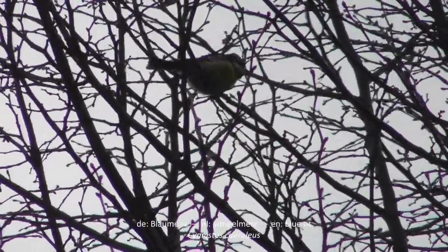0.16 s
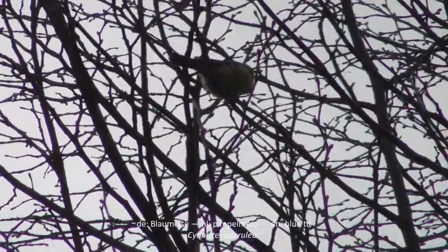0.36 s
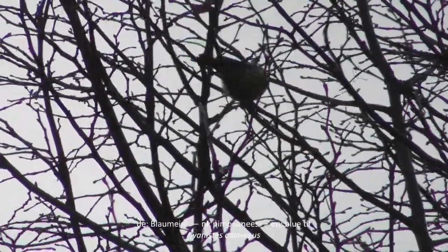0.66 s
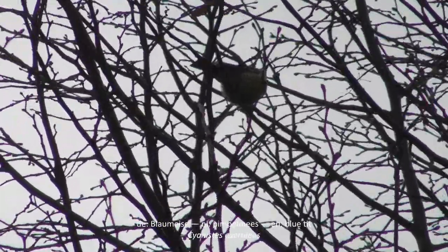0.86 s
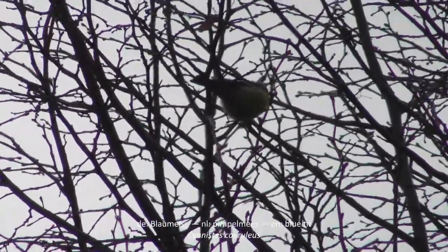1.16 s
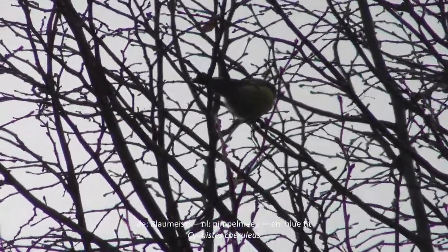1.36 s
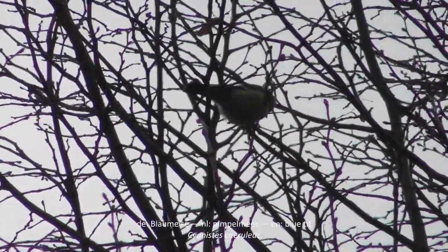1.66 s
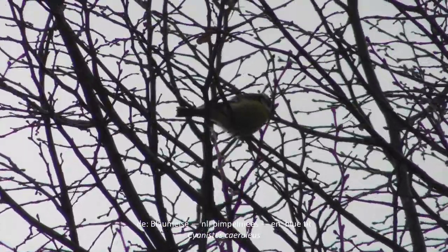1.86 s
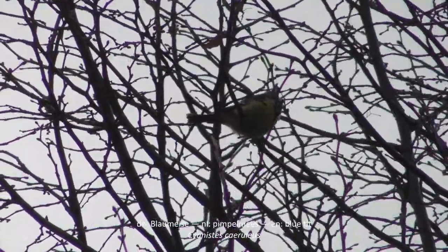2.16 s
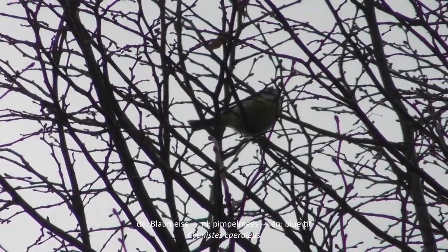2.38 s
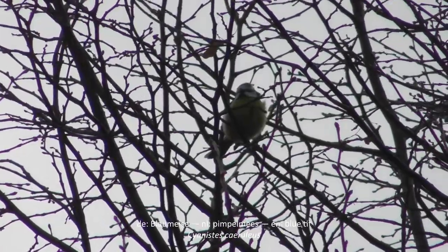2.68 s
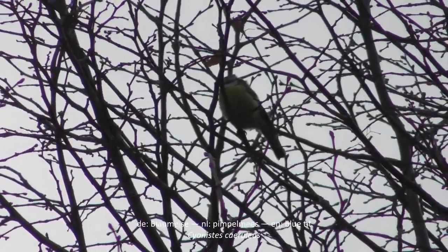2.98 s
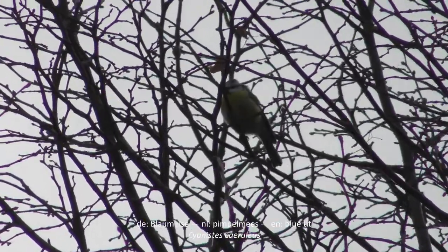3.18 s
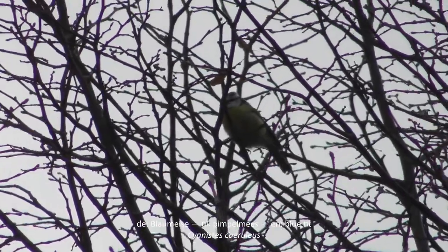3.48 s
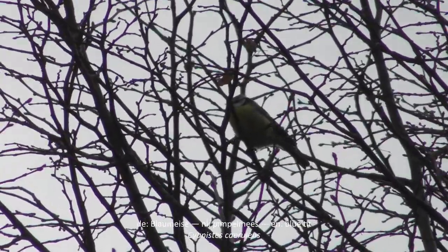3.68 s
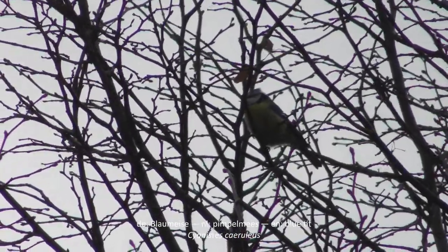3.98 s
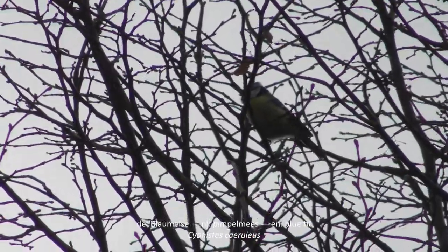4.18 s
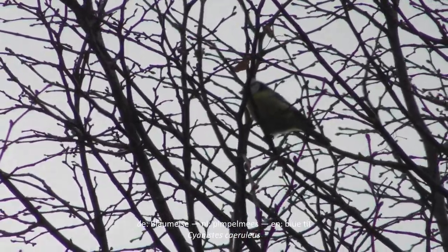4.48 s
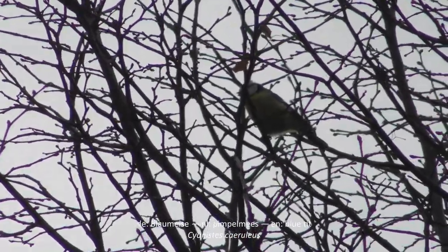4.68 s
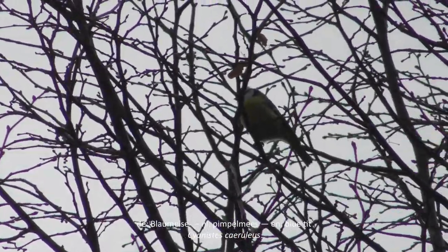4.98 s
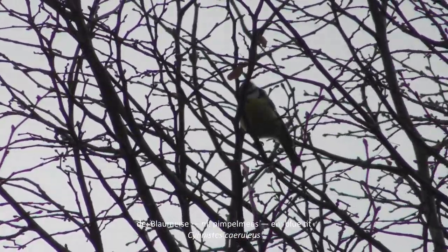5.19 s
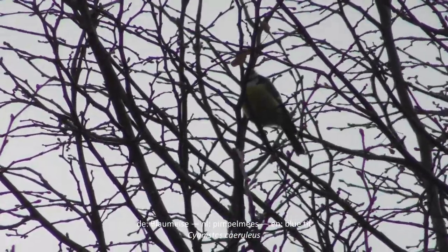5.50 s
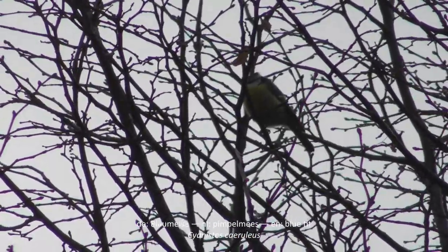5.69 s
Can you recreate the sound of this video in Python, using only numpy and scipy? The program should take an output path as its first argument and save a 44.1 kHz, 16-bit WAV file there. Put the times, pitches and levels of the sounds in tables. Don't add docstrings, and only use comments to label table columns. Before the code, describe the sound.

A small songbird in bare branches, heard outdoors through a camera microphone. From 0 to 0.65 s it gives five short, even, high notes near 4.8 kHz, about eight per second, with a light reverberant tail. Then it rests. Distant traffic fills the gap: a deep rumble, low drone and wavering engine hum, strongest around 1 s and easing by 3 s, under faint steady hiss. The camera's focus motor whirs softly and grainily, high-pitched, at 0.3, 1.5-1.9, 2.5-2.9, 4.0 and 5.8 s. At 3.45 and 3.72 s come two thin whistles, each flicking buzzily upward then falling from about 7.5 to 5.7 kHz, the second more broken. Seven slightly louder trill notes follow from 3.96 to 4.83 s, starting a little higher. Faint twig ticks occur at 0.4, 4.3, 4.4 and 5.05 s; dry leaves rustle most near 5 s. Very faint distant bird pipes appear at 0.14, 2.4 and 5.7 s.

```python
import sys
import numpy as np
from scipy import signal
from scipy.fft import rfft, irfft, next_fast_len
from scipy.io import wavfile
from scipy.ndimage import uniform_filter1d

SR = 44100
rng = np.random.default_rng(int(sys.argv[2]) if len(sys.argv) > 2 else 0)


def boost(x):
    u = np.asarray(x, float) / 20
    return 10 ** u


def put_to_file(sound):
    columns = np.atleast_2d(sound).T
    safe = np.clip(columns, -1, 1)
    whole_steps = np.round(safe * 32767)
    wavfile.write(sys.argv[1], SR, whole_steps.astype(np.int16))


N = 257544


def rms_one(x):
    return x / np.sqrt(np.mean(x ** 2) + 1e-20)


def in_time(rows):
    s, level_db = np.transpose(rows)
    return np.interp(np.arange(N) / SR, s, level_db)


def at_hz(points, hz):
    points_hz, values = np.transpose(points)
    return np.interp(np.log(hz), np.log(points_hz), values)


def drift(rate_hz):
    r = np.exp(-80 * np.pi * rate_hz / SR)
    white = rng.standard_normal(N // 40 + 2002)
    slow = signal.lfilter([1], [1, -2 * r, r * r], white)[2000:]
    return np.interp(np.arange(N) / 40, np.arange(len(slow)), rms_one(slow))


def resonance(x, hz, width_hz):
    r = np.exp(-np.pi * width_hz / SR)
    poles = [1, -2 * r * np.cos(2 * np.pi * hz / SR), r * r]
    return signal.lfilter([(1 - r * r) / 2, 0, (r * r - 1) / 2], poles, x)


def stereo(mid, side, hz):
    # (frequency [Hz], likeness [0..1])
    likeness = [(25, 0.01), (60, 0.55), (130, 0.68), (290, 0.78), (640, 0.7), (1410, 0.75), (5000, .8),
                (15000, 0.2)]
    # (frequency [Hz], level [dB])
    lean_db = [(30, -3), (70, -4.5), (130, -4.5), (250, -2.5), (500, -.8), (1000, 0.0), (8120, -.5),
               (15000, 0.5)]
    alike = at_hz(likeness, hz)
    lean = boost(at_hz(lean_db, hz) / 2 * np.array([[1], [-1]]))
    spread = np.sqrt(1 + alike) * mid + np.sqrt(1 - alike) * side * [[1], [-1]]
    return lean * spread / np.sqrt(1 + alike)


def stereo_noise(spectrum, step_oct, patchy_db):
    size = next_fast_len(N, real=True)
    hz = np.maximum(np.fft.rfftfreq(size, 1 / SR), 1)
    lowest_hz, highest_hz = spectrum[0][0], spectrum[-1][0]
    coloured = rfft(rng.standard_normal((2, size))) * boost(at_hz(spectrum, hz)) * (hz > lowest_hz)
    out = 0
    for centre_oct in np.arange(np.log2(lowest_hz), np.log2(highest_hz) + step_oct, step_oct):
        band = np.clip(1 - np.abs(np.log2(hz) - centre_oct) / step_oct, 0, 1)
        mid, side = irfft(coloured * band, size)[:, :N]
        out = out + boost(patchy_db * drift(2.8)) * stereo(mid, side, 2 ** centre_oct)
    return out / np.std(out.mean(axis=0))


def traffic():
    # (time [s], level [dB])
    nearness = [(0.0, -45.5), (0.93, -46.5), (0.96, -46), (1.06, -44.5), (2.18, -50), (3.37, -53),
                (3.67, -52.5), (3.71, -51), (4.57, -53.5), (4.98, -51.5), (5.73, -51.5), (5.84, -51)]
    # (frequency [Hz], density [dB per Hz])
    deep_spectrum = [(12, -29), (20, -21.5), (48, 9), (64, -5.5), (85, -6.5), (110, -58), (190, -120)]
    drone_spectrum = [(50, -35), (85, -1.5), (103, -3.5), (167, -4), (236, -1.5), (290, -6), (380, -32),
                      (640, -120)]
    roar_spectrum = [(170, -34.5), (290, -5), (312, -3.5), (434, 0), (554, -8.5), (633, -8), (930, -14),
                     (1090, -17.5), (1280, -28.5), (1450, -41), (1880, -62), (3190, -120)]
    # (start [s], end [s], pitch [Hz], waver [Hz], level [dB])
    engine_lines = [
        (-.3, 3.3, 59, 5, -55.5),
        (3.3, 4.6, 58, 6, -60),
        (4.5, 5.4, 50, 3, -56),
        (.85, 2.65, 103, 3, -58),
        (3.3, 3.95, 104, 4, -57),
        (-.3, .65, 235, 4, -56),
        (.2, .7, 435, 10, -61),
        (1.7, 2.9, 372, 10, -65),
        (3.85, 4.3, 392, 8, -64),
        (3.4, 3.9, 204, 6, -63),
    ]
    near_db = in_time(nearness)
    mean_db = near_db.mean()
    swing_db = near_db - mean_db
    t, hums = np.arange(N) / SR, 0
    for start_s, end_s, hz, waver_hz, hum_db in engine_lines:
        gate = np.clip(np.minimum(t - start_s, end_s - t) / .15, 0, 1)
        swell = gate * boost(hum_db + 3.5 * drift(4.0))
        phase = 2 * np.pi * np.cumsum(hz + .5 * waver_hz * drift(3.06)) / SR
        hums = hums + np.sqrt(2) * swell * stereo(np.sin(phase), np.cos(phase), hz)
    deep = boost(mean_db - 10.5 + 0.41 * swing_db) * stereo_noise(deep_spectrum, 0.89, patchy_db=1.8)
    drone = boost(mean_db - 5 + 0.87 * swing_db) * stereo_noise(drone_spectrum, 1, patchy_db=1.2)
    roar = boost(mean_db - 5.5 + 0.57 * swing_db) * stereo_noise(roar_spectrum, .5, patchy_db=.6)
    return deep + drone + hums + roar


def air():
    # (frequency [Hz], density [dB per Hz])
    hiss_spectrum = [(880, -24), (1450, -7.5), (1900, -8), (2480, -9.5), (4210, -10.5), (5070, -12),
                     (5710, -7), (7660, 1.5), (12200, -1), (15700, -2)]
    # (time [s], level [dB])
    breeze = [
        (0, -27),
        (1.5, 0),
        (3.3, -3),
        (4.2, 3.5),
        (5.05, 8),
        (5.4, 5),
        (5.84, 7),
    ]
    hiss = boost(-68.5) * stereo_noise(hiss_spectrum, 0.22, patchy_db=0.1)
    leaves = resonance(resonance(rng.standard_normal(N), 6830, 3300.0), 6830, 3300.0)
    return hiss + boost(-74.5 + in_time(breeze) + 0.58 * drift(12.0)) * rms_one(leaves)


def housing(x):
    # (frequency [Hz], width [Hz], share lost [0..1])
    dips = [(1470, 150, .75), (2480, 250, .5), (5100, 400, .5)]
    for hz, width_hz, share in dips:
        x = x - share * resonance(x, hz, width_hz)
    return x


def sing(notes, wobble_hz, tilt_db, sag_hz, ragged):
    # (frequency [Hz], gain [dB])
    throat = [(1500, -45), (3000, -35), (4800, -3), (6500, -0.5), (8200, 8.5), (10000, -5), (12000, -22),
              (16000, -25)]
    sag_s = 0.0252
    out = np.zeros(N)
    wobble, flutter, level_flutter = wobble_hz * drift(75.0), drift(225.0), drift(96.0)
    k = np.arange(1, 11)[:, None]
    for note in notes:
        s, hz, level_db, overtone_db = np.transpose(note)
        at = np.arange(round(s[0] * SR), min(round(s[-1] * SR), N))
        t = at / SR
        richness_db = np.interp(t, s, overtone_db)
        pitch = uniform_filter1d(np.exp(np.interp(t, s, np.log(hz))), size=88) + wobble[at]
        pitch -= sag_hz * np.clip(1 - (s[-1] - t) / sag_s, 0, 1) ** 2
        pitch *= 1 + 0.064 * boost(richness_db) * flutter[at]
        phase = 2 * np.pi * np.cumsum(pitch) / SR
        partial_db = (k > 1) * (richness_db + tilt_db * (k - 2)) + at_hz(throat, k * pitch)
        stack = boost(partial_db) * (k * pitch < SR / 2) * np.sin(k * phase + k * k)
        fade = np.clip(np.minimum(at - at[0], at[-1] - at) / (.006 * SR), 0, 1)
        level = boost(uniform_filter1d(np.interp(t, s, level_db), size=132)) * (1 + ragged * level_flutter[at])
        out[at] += np.sqrt(2) * np.sin(np.pi / 2 * fade) ** 2 * level * stack.sum(axis=0)
    return out


def far_birds():
    # (start [s], length [s], first pitch [Hz], last pitch [Hz], level [dB])
    pipes = [
        (0, .05, 4900, 4930, -59),
        (.14, .16, 8050, 7950, -87),
        (2.40, .11, 5100, 5180, -82),
        (5.68, .1, 7950, 7940, -86),
    ]
    return [[(start_s, first_hz, level_db, -40), (start_s + length_s, last_hz, level_db, -40)]
            for start_s, length_s, first_hz, last_hz, level_db in pipes]


def trill():
    # (start [s], first pitch [Hz], last pitch [Hz], level [dB], swell through the note [dB])
    trill_rows = [(0.033, 4984, 4810, -41.5, 7), (0.162, 4926, 4780, -43, -2.5), (0.28, 4885, 4770, -42, 5),
                  (0.415, 4860, 4766, -41, 5.5), (0.547, 4794, 4830, -42, 8), (3.963, 5410, 4970, -38, 8),
                  (4.095, 5120, 4950, -38, 5), (4.22, 4950, 4984, -41, 7), (4.35, 5007, 4790, -40, 0),
                  (4.48, 4950, 4814, -41.5, 3), (4.612, 4964, 4725, -40, -2), (4.748, 4984, 4670, -42.5, 2)]
    note_s, attack_s, release_s = 0.086, 0.02, 0.027
    onset_db, end_db, overtone_db = -17, -27, -27
    s = np.array([0, attack_s, note_s / 2, note_s - release_s, note_s])
    fallen = np.interp(s, [0, note_s / 2, note_s], [0, .8, 1])
    notes = []
    for start_s, first_hz, last_hz, level_db, swell_db in trill_rows:
        pitch_hz = first_hz + (last_hz - first_hz) * fallen
        course_db = level_db + np.array([onset_db, -swell_db / 2, 0, swell_db / 2, end_db])
        notes.append(np.transpose([start_s + s, pitch_hz, course_db, np.full(len(s), overtone_db)]))
    return notes


def focus_motor():
    # (start [s], end [s], level [dB])
    spells = [
        (.29, .402, -64.5),
        (1.522, 1.868, -64.5),
        (2.528, 2.878, -65),
        (4.018, 4.14, -66.5),
        (5.80, 5.9, -64.5),
    ]
    # (frequency [Hz], width [Hz], level [dB])
    rings_table = [(7520, 40, -8), (7810, 40, -11), (8040, 50, -11), (8175, 40, -7), (8620, 150, -6),
                   (7450, 450, .5), (7950, 600, 2), (8480, 500, 2.5)]
    t = np.arange(N) / SR
    teeth = 1 + 0.2 * np.sin(2 * np.pi * 375 * t) + 0.92 * np.sin(2 * np.pi * 282 * t)
    whir = teeth * rng.standard_normal((2, N))
    rings, gate = 0, 0
    for hz, width_hz, ring_db in rings_table:
        ring = resonance(resonance(whir, hz, width_hz), hz, width_hz)
        rings = rings + boost(ring_db) * rms_one(ring)
    for start_s, end_s, spell_db in spells:
        gate = gate + boost(spell_db) * np.clip(np.minimum(t - start_s, end_s - t) / 0.0041, 0, 1)
    mid, side = rms_one(rings)
    return gate * (mid + boost(-11) * side * [[1], [-1]])


def twigs():
    # (time [s], peak level [dB], frequency [Hz])
    ticks = [
        (0.375, -58, 6400),
        (4.296, -59, 6400),
        (4.444, -60.5, 3000),
        (5.051, -55, 7300),
    ]
    out, t = np.zeros(N), np.arange(600) / SR
    for s, peak_db, hz in ticks:
        burst = resonance(rng.standard_normal(len(t)), hz, 1700.0) * np.exp(-t / 0.009)
        out[round(s * SR):][:len(t)] += boost(peak_db) * burst / np.abs(burst).max()
    return out


def whistles():
    # (time before the top [s], pitch [Hz], level re the top [dB], overtone level [dB])
    rush = [
        (.034, 875, -30, -4),
        (.022, 1350, -23, 0),
        (.016, 2250, -22, 0),
        (.0115, 4250, -16, 3),
        (.0065, 6050, -3, -22),
        (.003, 7050, -1, -26),
    ]
    # (time [s], pitch [Hz], effort [dB])
    courses = [
        [(3.482, 7470, -34), (3.5, 7680, -35.5), (3.53, 7240, -46), (3.555, 6910, -35), (3.58, 6650, -30),
         (3.62, 6240, -36.5), (3.634, 5760, -47)],
        [(3.752, 7420, -38), (3.77, 7530, -41.5), (3.787, 7320, -34), (3.82, 7070, -40), (3.85, 6550, -32),
         (3.862, 6340, -44), (3.885, 6510, -33), (3.903, 6200, -43.5), (3.914, 5660, -61)],
    ]
    notes = []
    for course in courses:
        top_s, _, top_db = course[0]
        rise = [(top_s - ahead_s, hz, top_db + below_db, overtone_db)
                for ahead_s, hz, below_db, overtone_db in rush]
        fall = [(s, hz, level_db, -29) for s, hz, level_db in course]
        notes.append(rise + fall)
    return notes


def branches(x):
    # (delay [s], level [dB])
    echoes = [(.0058, -7.5), (.0105, -17.5), (.016, -13.5)]
    scatter_db, scatter_t60_s = -10.5, 0.43
    walls_db, walls_t60_s, walls_cut_hz = -20, 1.6, 5600
    t = np.arange(SR) / SR
    noise = rng.standard_normal((2, len(t)))
    dull = signal.sosfilt(signal.butter(4, walls_cut_hz, fs=SR, output="sos"), noise)
    cloud = noise * boost(-60 * t / scatter_t60_s) + dull * boost(walls_db - 60 * t / walls_t60_s)
    cloud = cloud * np.clip(t / 0.004, 0, 1)
    cloud = boost(scatter_db) * cloud / np.sqrt(np.sum(cloud[0] ** 2))
    path = cloud[0] + boost(-18) * cloud[1] * [[1], [-1]]
    path[:, 0] = boost(np.array([-.6, .6]))
    path[:, :2] += 0.1 * np.array([[0.35, -1.5], [-0.31, 1.0]])
    for delay_s, echo_db in echoes:
        path[:, round(delay_s * SR)] += boost(echo_db)
    return signal.fftconvolve(x[None], path)[:, :N]


def scene():
    background = housing(traffic() + air())
    pipes = sing(whistles() + far_birds(), wobble_hz=12.6, tilt_db=0, sag_hz=0, ragged=.15)
    trills = sing(trill(), wobble_hz=15.7, tilt_db=-6, sag_hz=605, ragged=0.3)
    return branches(pipes + trills + twigs()) + background + focus_motor()


def drop_masked(x, depth_db, fall_db, far_db, top_hz):
    hz, _, bins = signal.stft(x, SR, nperseg=1024, boundary="even")
    power = np.abs(bins.mean(axis=0)) ** 2
    away = np.arange(-60, 61)[:, None]
    slope = boost(depth_db + fall_db * np.maximum(away, -2 * away)) ** 2
    heard = power * np.where(hz > 3000, 1, .12)[:, None]
    masked = signal.fftconvolve(heard, slope, mode="same", axes=0)
    masked = masked + boost(far_db) ** 2 * heard[hz > 3000].sum(axis=0)
    keep = np.clip(uniform_filter1d(power, size=5, axis=0) / (masked + 1e-20), 0, 1) ** 4
    return signal.istft(bins * keep * (hz < top_hz)[:, None], nperseg=1024)[1][:, :N]


def top_cut(x):
    return signal.sosfilt(signal.butter(12, 15790, fs=SR, output="sos"), x)


def record(dry):
    mix = drop_masked(dry, depth_db=-31, fall_db=-.5, far_db=-71, top_hz=15790)
    return top_cut(mix)


dry = scene()
out = record(dry)
put_to_file(out)
```